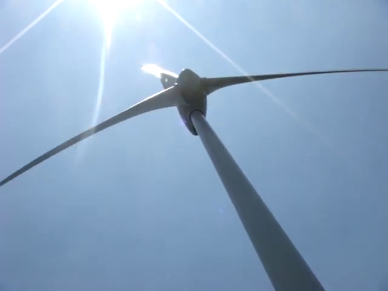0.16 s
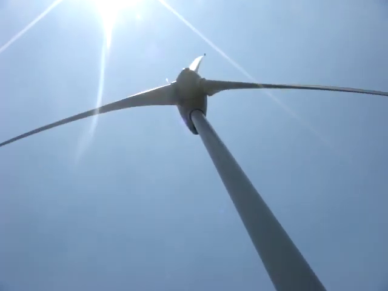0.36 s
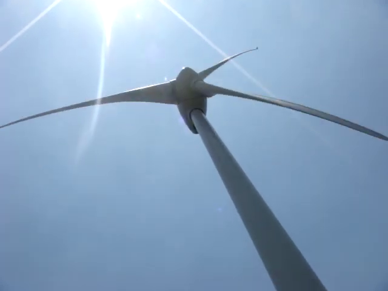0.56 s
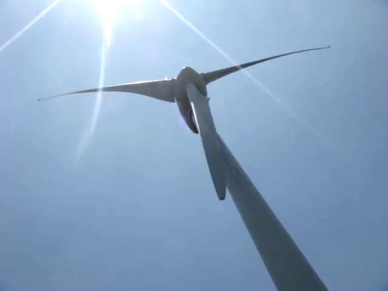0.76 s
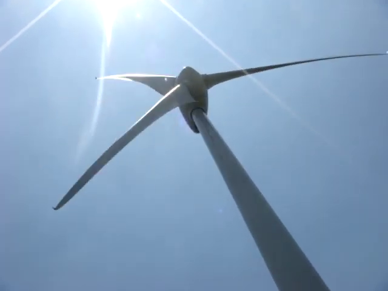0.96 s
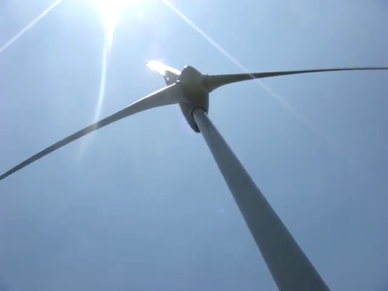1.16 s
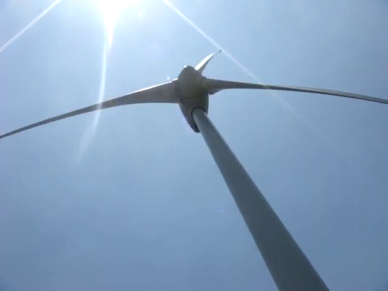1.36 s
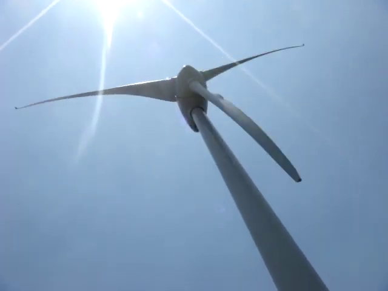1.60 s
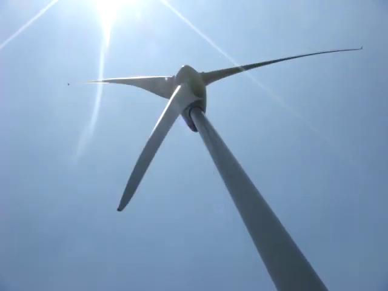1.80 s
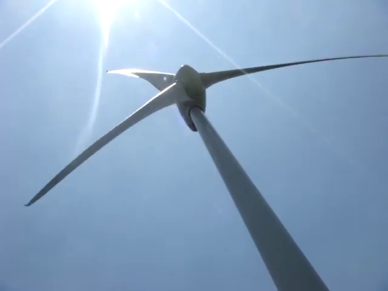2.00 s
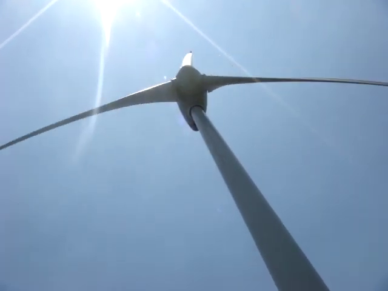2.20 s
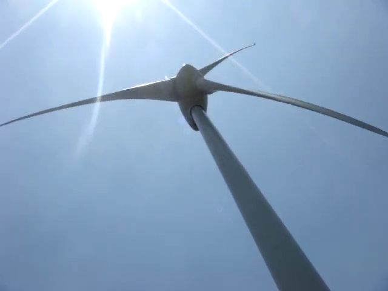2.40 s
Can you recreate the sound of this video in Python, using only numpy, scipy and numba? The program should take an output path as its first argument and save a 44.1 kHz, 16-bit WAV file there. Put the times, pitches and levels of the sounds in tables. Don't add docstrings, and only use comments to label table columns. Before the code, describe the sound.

Wind buffets a microphone in low thumps, then a hard gust roars and tears across it

```python
import sys
import numpy as np
from scipy import signal
from scipy.io import wavfile
from scipy.ndimage import uniform_filter1d
from numba import njit

SR = 44100
rng = np.random.default_rng(int(sys.argv[2]) if len(sys.argv) > 2 else 0)


def volts_from_decibels(level):
    exponent = np.asarray(level, float) / 20
    return 10 ** exponent


def transcribe(u):
    v = np.clip(np.atleast_2d(u).T, -1, 1)
    q = np.round(v * 32767).astype(np.int16)
    wavfile.write(sys.argv[1], SR, q)


N = 108045


def unit(x):
    return x / np.sqrt(np.mean(x ** 2))


def curve(table, col):
    a = np.array(table, float)
    return np.interp(np.arange(N) / SR, a[:, 0], a[:, col])


@njit
def svf(x, hz, share):
    y, band, low = np.empty(len(x)), 0., 0.
    for i in range(len(x)):
        g = np.tan(np.pi * hz[i] / SR)
        v = (band + g * (x[i] - low)) / (1 + g * (g + share))
        band = 2 * v - band
        low = low + 2 * g * v
        y[i] = share * v
    return y


def walk(rate):
    hold = int(SR / rate)
    steps = np.repeat(rng.standard_normal(N)[:N // hold + 1], hold)
    w = uniform_filter1d(uniform_filter1d(steps, hold), hold)[:N]
    return w / w.std()


def steady(x, span_s):
    span = int(span_s * SR)
    power = uniform_filter1d(uniform_filter1d(x ** 2, span), span)
    return x / np.sqrt(power + 1e-12)


def eddies(hz, shape, shared_db, own_db, rate, even_s):
    steady_cycles = 14.7
    push = rng.standard_normal(N) * volts_from_decibels(shared_db * walk(rate))
    out = 0
    for times, share, db in shape:
        centre = np.clip(hz * times, 20., 9000.)
        band = push
        for _ in range(3):
            band = svf(band, centre, 2.0 * share)
        span_s = np.clip(steady_cycles / (times * np.median(hz)), .022, .06)
        out = out + volts_from_decibels(db + own_db * walk(rate / 2)) * steady(band, span_s)
    return steady(out, even_s)


def blades():
    # (frequency [Hz], level per Hz [dB])
    wash = [(500, 14.5), (1000, -7), (1700, 3.5), (2500, -7.5), (4000, -5.5), (6000, -6.5), (8000, -8.5),
            (10000, -18.5)]
    wash_db, blade_hz, nearest_s = -36, 1.0, 0.7
    swish_db, swish_bright_db = 2.5, -0.5
    t, a = np.arange(N) / SR, np.array(wash, float)
    near = np.cos(2 * np.pi * blade_hz * (t - nearest_s))
    drift = walk(8.34)
    out = 0
    for hz in 500 * 2 ** np.arange(0, 4.6, .5):
        db = np.interp(np.log(hz), np.log(a[:, 0]), a[:, 1])
        db = db + .7 * drift + .5 * walk(14)
        db = db + near * (swish_db + swish_bright_db * np.log2(hz / 3000))
        centre = np.full(N, hz)
        hiss = svf(svf(rng.standard_normal(N), centre, 0.89), centre, 0.89)
        out = out + volts_from_decibels(db) * hiss
    return unit(out) * volts_from_decibels(wash_db)


def buffeting():
    # (time [s], level [dB], length [s], eddy frequency [Hz])
    swells = [(.027, -22, .01, 340), (1.915, -8, .018, 150), (.184, -15, .016, 300), (.215, -20, .015, 280),
              (.267, -21, .012, 260), (.326, -16, .01, 300), (.352, -14, .011, 290), (.498, -14, .022, 205),
              (.587, -18, .013, 190), (.66, -21, .012, 250), (.74, -18, .02, 260), (.775, -11, .011, 195),
              (.846, -12, .011, 200), (.954, -16, .014, 210), (.98, -19, .012, 280),
              (1.077, -17, .012, 195), (1.105, -18, .018, 175), (1.15, -19, .014, 190),
              (1.241, -18, .011, 190), (1.327, -14, .013, 180), (1.405, -18, .013, 195),
              (1.547, -19, .014, 215), (1.605, -15, .02, 240), (1.667, -18, .011, 205),
              (1.739, -16, .024, 185), (1.81, -15, .012, 250), (1.838, -14, .01, 200),
              (2.265, -28, .01, 340), (2.334, -19, .012, 280), (2.375, -20, .012, 240)]
    # (time [s], level [dB])
    lull = [(0, -25), (.1, -22.5), (.3, -20), (.43, -21), (.62, -23.5), (.82, -17.5), (.9, -18),
            (1.0, -23.5), (1.2, -20.5), (1.5, -22.5), (1.6, -19), (1.85, -21.5), (2.0, -14), (2.3, -35.5),
            (2.45, -25.5)]
    # (multiple of eddy frequency [ratio], bandwidth share [ratio], level [dB])
    eddy_sizes = [(.3, 0.3, -10.5), (.55, 1, 2), (1.1, 0.84, 5), (2.2, 0.48, -8.5), (3.5, 0.43, -18.5),
                  (5.5, 0.88, -28)]
    lull_hz = 213
    t = np.arange(N) / SR
    power = volts_from_decibels(curve(lull, 1)) ** 2
    pitch = power * lull_hz
    for s, db, length, hz in swells:
        swell = volts_from_decibels(db) ** 2 * np.exp(-((t - s) / length) ** 2)
        power = power + swell
        pitch = pitch + swell * hz
    rumble = eddies(pitch / power, eddy_sizes, shared_db=4.5, own_db=1.5, rate=120, even_s=.016)
    return np.sqrt(power) * rumble


def pops():
    # (time [s], peak level [dB], width [ms], push + or suck - [ratio])
    hits = [(0.028, -7, 0.19, -0.19), (0.182, -22, 0.46, -0.2), (0.1913, -1, 0.74, 0.62),
            (0.3287, -8.5, 0.88, 1), (0.3488, -5.5, 0.92, 1), (.352, -9, .35, 1), (.355, 0, .22, -1),
            (.6567, -8, .27, 1), (.773, -7, .8, -1), (.848, -8, .35, -1), (0.9533, -0.5, 0.57, -0.51),
            (0.991, -9, 0.13, 0.14), (1.327, -4, .8, -1.14), (1.8403, -5, 0.99, 1), (1.893, 1.5, 0.54, 1),
            (2.176, 12, 0.3, -1.5)]
    t, out = np.arange(N) / SR, 0
    for s, db, width_ms, way in hits:
        u = (t - s) * 1000 / width_ms
        spike = np.exp(-u ** 2)
        dip = .3 * np.exp(-((u - 1.5) / 3.5) ** 2)
        out = out + way * volts_from_decibels(db) * (spike - dip) * 1.4
    return out


def gust():
    # (time [s], level [dB], eddy frequency [Hz], tearing level [dB], tearing centre [Hz])
    course = [
        (1.86, -22.5, 245, -32.5, 900),
        (1.9, -11, 241, -36.5, 1210),
        (1.935, -2, 384, -26.5, 1600),
        (1.96, 0, 505, -16.5, 2210),
        (2.025, 1.5, 648, -9.5, 2960),
        (2.075, 0.5, 574, -16, 2500),
        (2.12, 0, 593, -12.5, 2500),
        (2.2, -3, 398, -14, 1700),
        (2.245, -28, 370, -17.5, 1140),
    ]
    # (multiple of eddy frequency [ratio], bandwidth share [ratio], level [dB])
    gust_sizes = [(0.121, 0.79, -20), (0.399, 0.36, -2), (1.049, 0.79, 7), (2.2, 0.58, -5.5)]
    t = np.arange(N) / SR
    eddy_hz = np.maximum(curve(course, 2), 100)
    roar = eddies(eddy_hz, gust_sizes, shared_db=3, own_db=1, rate=300, even_s=.005)
    rip = walk(420)
    centre = np.clip(curve(course, 4) * np.exp(.11 * rip + .05 * walk(70)), 300, 9000)
    tear = rng.standard_normal(N)
    for _ in range(4):
        tear = svf(tear, centre, 1.7)
    tear = steady(tear, .006) * volts_from_decibels(curve(course, 3) + 2.6 * rip + .9 * walk(70))
    blowing = (t > course[0][0]) * (t < course[-1][0])
    return (roar + tear) * volts_from_decibels(curve(course, 1)) * blowing


def starve(x):
    limit_db, scatter_db, from_hz = -52, 5.5, 4500
    f, _, z = signal.stft(x, SR, nperseg=384)
    power = np.abs(z) ** 2
    bins, frames = len(f), power.shape[-1]
    patch = np.add.reduceat(power, np.arange(0, bins, 8), axis=-2)
    patch = np.repeat(patch, 8, axis=-2)[:, :bins]
    scatter = np.repeat(rng.standard_normal((bins // 8 + 1, frames // 2 + 1)), 8, axis=0)
    scatter = np.repeat(scatter, 2, axis=1)[:bins, :frames]
    limit = volts_from_decibels(limit_db + scatter_db * scatter)
    loud = uniform_filter1d(power.sum(-2, keepdims=True), size=3, axis=-1)
    keep = (patch > loud * limit ** 2) | (f < from_hz)[:, None]
    return signal.istft(z * np.where(keep, 1, .03), SR, nperseg=384)[1][:, :N]


def scene():
    return (blades() + buffeting() + pops() + gust())[None]


def roll_off(x):
    return signal.sosfilt(signal.butter(12, 10070, fs=SR, output="sos"), x)


def record(dry):
    # (time [s], gain [dB])
    gain_course = [
        (0, -6),
        (.6, -1.5),
        (1.9, -1),
        (1.95, -6.5),
        (2.05, -10),
        (2.2, -14.5),
        (2.45, -13),
    ]
    mic_low_hz, ceiling, top_hz = 60, 1.5, 10050
    bass_cut = signal.butter(1, mic_low_hz, "high", fs=SR, output="sos")
    x = signal.sosfilt(bass_cut, dry) * volts_from_decibels(curve(gain_course, 1))
    x = starve(ceiling * np.tanh(x / ceiling))
    steep_top = signal.ellip(8, .2, 45, top_hz, fs=SR, output="sos")
    x = signal.sosfiltfilt(steep_top, x)
    return roll_off(np.clip(x, -.99, .99))


dry = scene()
out = record(dry)
transcribe(out)
```